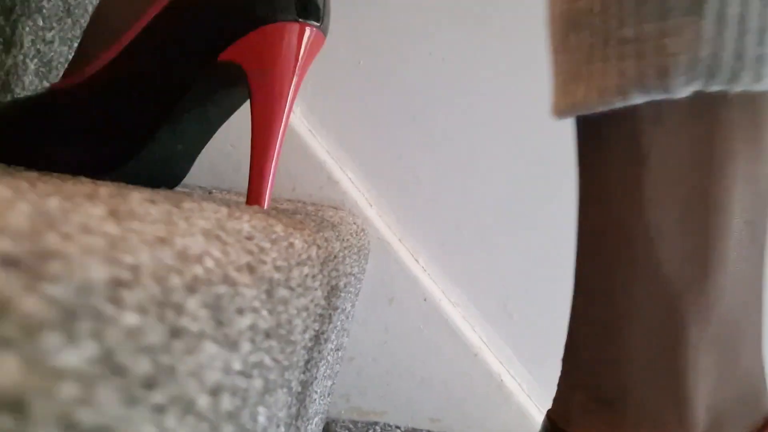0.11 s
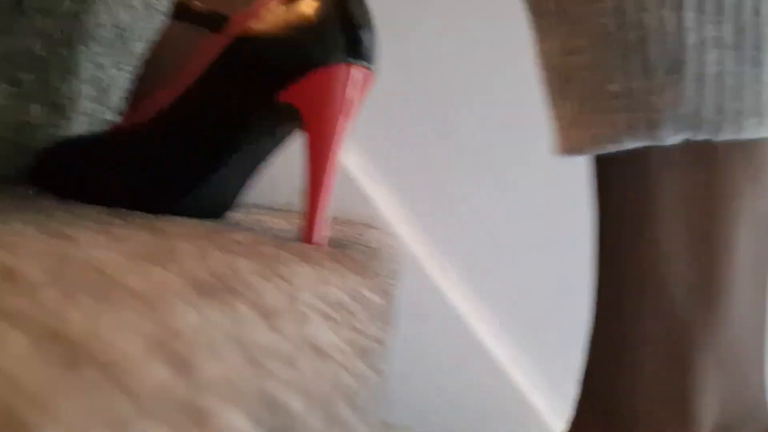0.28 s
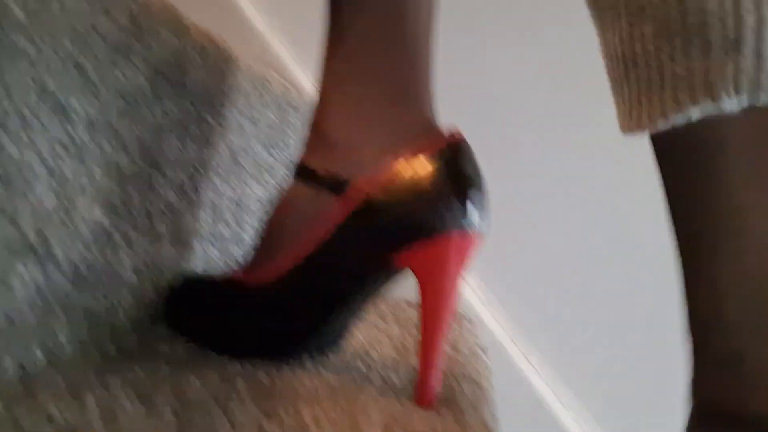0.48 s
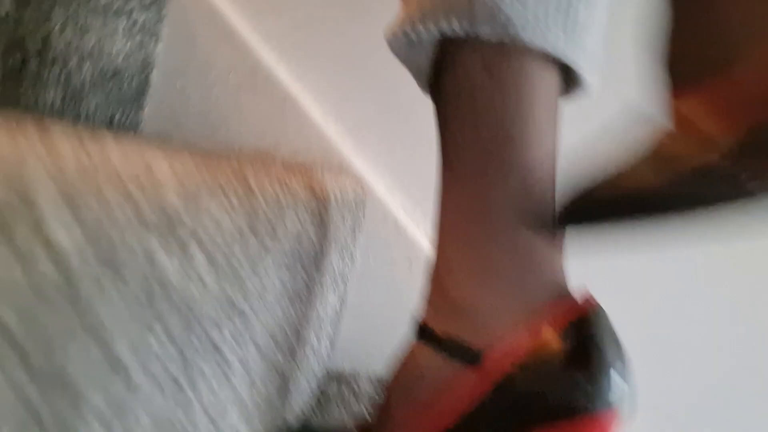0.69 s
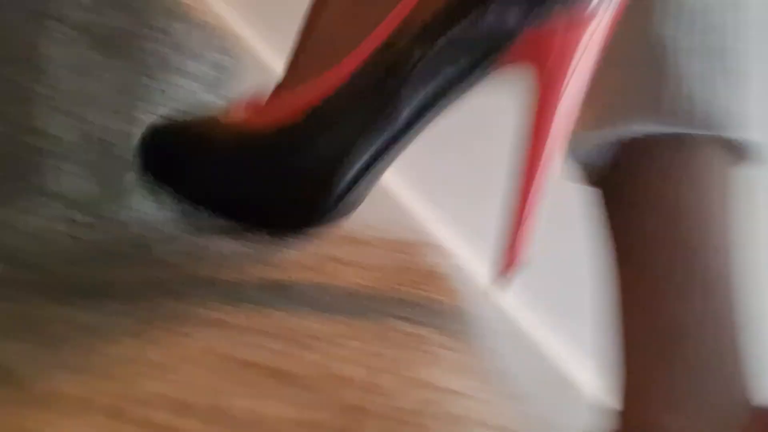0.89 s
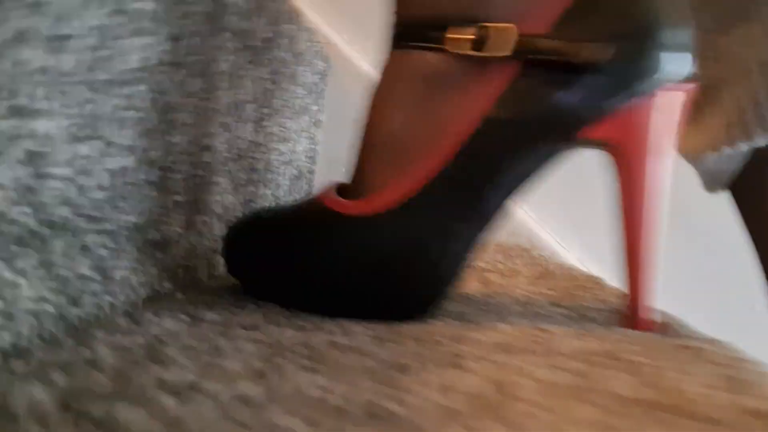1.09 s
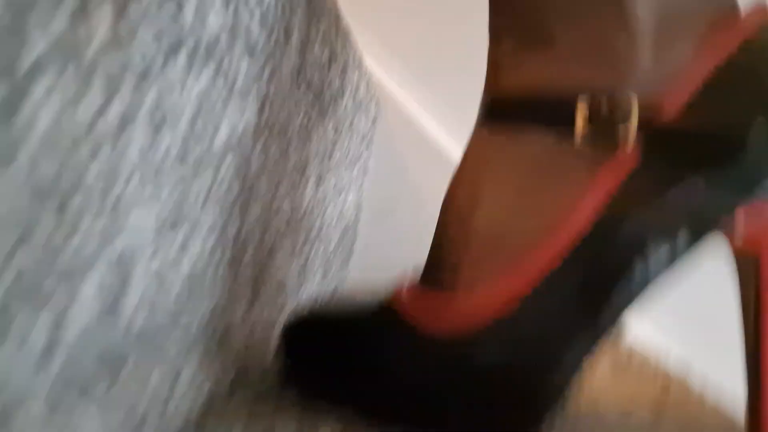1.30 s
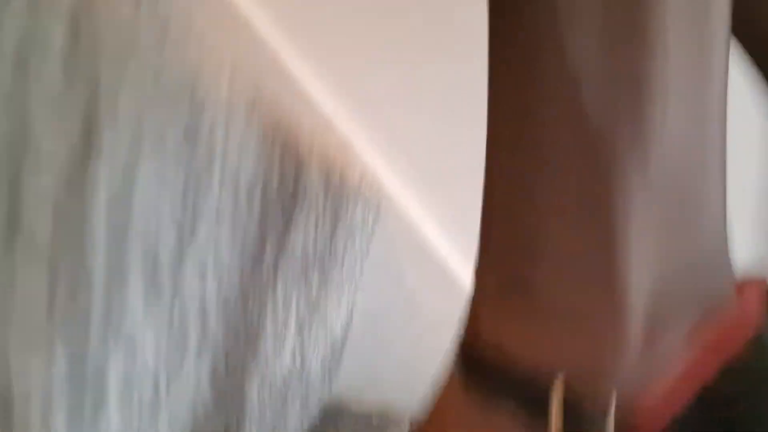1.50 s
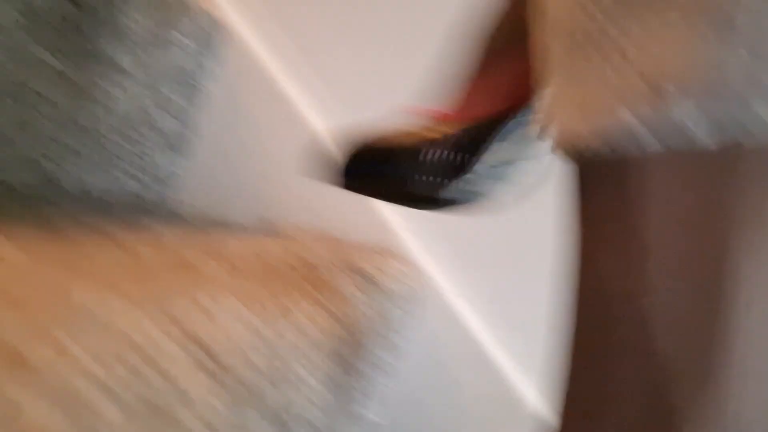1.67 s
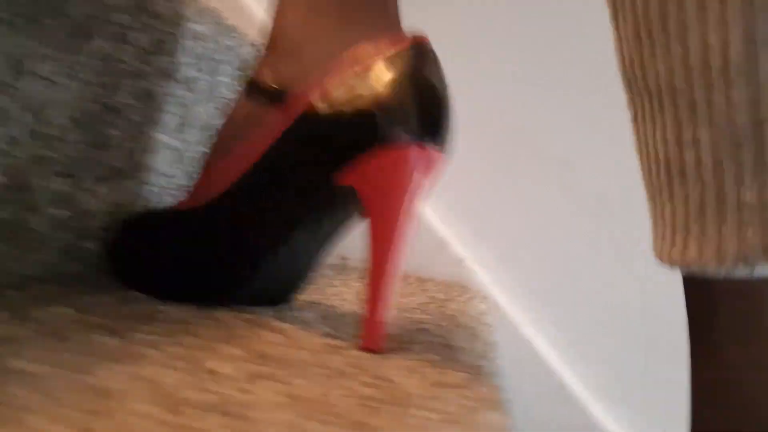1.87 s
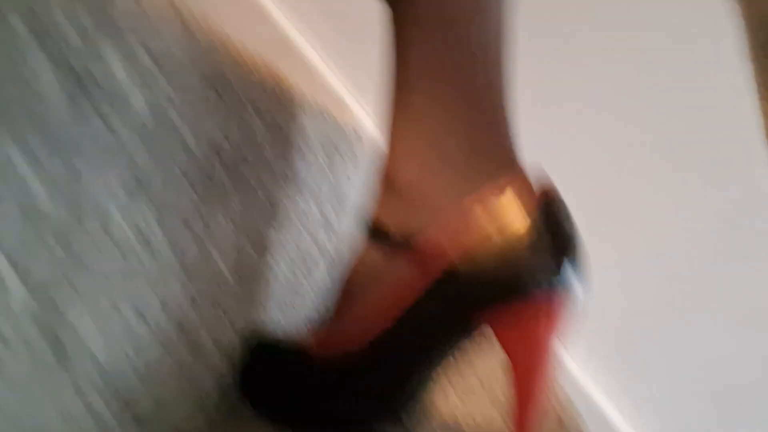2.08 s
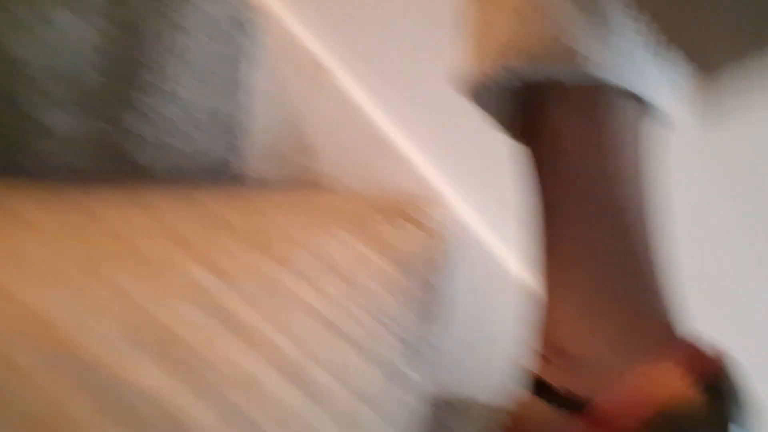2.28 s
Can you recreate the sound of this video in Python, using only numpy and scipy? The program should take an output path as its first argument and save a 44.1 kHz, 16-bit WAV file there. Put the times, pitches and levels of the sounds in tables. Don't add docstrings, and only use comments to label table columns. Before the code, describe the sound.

High-heeled footsteps on carpeted wooden stairs, close and stereo. Muffled low thuds land at 0.2 and 0.35 s with cloth brushing. Around 1.0-1.1 s a deep thump and carpet scuff lead to dull touches at 1.22 and the loudest, sharp woody heel knock at 1.28. Quiet rustles and faint low creaking sway follow; a soft thud at 1.98, firmer padded tap at 2.09, small ticks to 2.2. Short indoor tail, faint hiss.

```python
import sys
import numpy as np
from scipy import signal
from scipy.fft import rfft, irfft, next_fast_len
from scipy.io import wavfile
from scipy.ndimage import uniform_filter1d

SR = 44100
rng = np.random.default_rng(int(sys.argv[2]) if len(sys.argv) > 2 else 0)


def wav_out(sig):
    wavfile.write(sys.argv[1], SR, np.round(np.clip(np.atleast_2d(sig).T, -1, 1) * 32767).astype(np.int16))


def amp(db):
    return 10 ** (np.asarray(db, float) / 20)


N = 105840
LEFT_RIGHT = np.array([[1], [-1]])


def in_time(rows):
    s, *columns = np.transpose(rows)
    return [np.interp(np.arange(N) / SR, s, column) for column in columns]


def rms_one(x):
    return x / np.sqrt(np.mean(x ** 2) + 1e-20)


def at_hz(points, hz):
    point_hz, point_db = np.transpose(points)
    return np.interp(np.log(hz), np.log(point_hz), point_db)


def low_cut(hz, corner_hz):
    return -12 * np.maximum(np.log2(corner_hz / hz), 0)


def colour(x, db_at):
    hz = np.maximum(np.fft.rfftfreq(N, 1 / SR), 20)
    return irfft(rfft(x) * amp(db_at(hz)), N)


def body(force, modes, flip):
    out = 0
    for k, (hz, db, t60) in enumerate(modes):
        r, w = amp(-60 / (t60 * SR)), 2 * np.pi * hz / SR
        sign = -1 if flip and k % 2 else 1
        ring = signal.lfilter([0, np.sin(w)], [1, -2 * r * np.cos(w), r * r], force + 1e-18)
        out = out + sign * amp(db) * ring
    return out


def push(s, db, width_s):
    out, start = np.zeros(N), int(s * SR)
    t = np.maximum(np.arange(start, start + 2000) / SR - s, 0) / (width_s / 4)
    out[start:start + len(t)] = t * np.exp(-t)
    return amp(db) * out / out.sum()


def sides(x, pan_db, lag_s):
    n = np.arange(N)
    later = np.interp(n - lag_s * SR * np.tanh(pan_db / 3), n, x)
    return np.array([x * amp(pan_db / 2), later * amp(-pan_db / 2)])


def swell(s, length, db, pan_db):
    rise_share = 0.19
    u = (np.arange(N) / SR - s) / length
    shape = np.clip(np.minimum(u / rise_share, (1.3 - u) / (1.3 - rise_share)), 0, 1) ** 1.33
    return shape * amp(db + pan_db / 2 * LEFT_RIGHT)


def fibres():
    grains_per_s, spread_db, hiss_share = 2500, 7.5, 0.7
    struck = rng.random(N) < grains_per_s / SR
    strength = amp(spread_db * np.minimum(rng.exponential(1, N), 4))
    ticks = struck * strength * rng.choice([-1, 1], N)
    return hiss_share * rng.standard_normal((2, N)) + (1 - hiss_share) * rms_one(ticks)


def pile(rows, rise_db, fall_db):
    noise, out = fibres(), 0
    for s, length, db, top_hz, pan in rows:
        def peak(hz):
            octaves = np.log2(hz / top_hz)
            return np.minimum(rise_db * octaves, -fall_db * octaves)
        out = out + rms_one(colour(noise, peak)) * swell(s, length, db, pan)
    return out


def loaded(modes):
    x = rms_one(body(rng.standard_normal(2 * N), modes, False)[N:])
    return rms_one(x / np.sqrt(uniform_filter1d(x * x, size=3000) + 0.32))


# frequency in Hz, gain in dB.
MIC_PORT = [(7600, 1.14), (8500, -6), (9200, 4.5), (11500, -0.7), (15700, 5)]
# frequency in Hz, level in dB per Hz.
AIR_SPECTRUM = [(88, -26), (150, -3.5), (172, -16), (239, -9.5), (492, -24.5), (850, -21), (8470, -39.5),
                (9520, -37), (15800, -49.5)]
# frequency in Hz, likeness from 0 to 1.
LIKENESS = [(150, 0.91), (500, 0.086), (2000, 0.028), (15000, 0.014)]


def air():
    def share(sign):
        def db_at(hz):
            alike = np.clip(at_hz(LIKENESS, hz), 0, .99)
            spectrum = at_hz(AIR_SPECTRUM, hz) + at_hz(MIC_PORT, hz) + low_cut(hz, 150)
            return spectrum + 10 * np.log10(1 + sign * alike)
        return db_at

    mid, side = rng.standard_normal((2, N))
    return amp(-70.5) * rms_one(colour(mid, share(0.93)) + colour(side, share(-1.06)) * LEFT_RIGHT)


# frequency in Hz, level in dB per Hz.
CLOTH_SPECTRUM = [(880, -43), (1500, -0.5), (2410, -1.5), (3790, -10), (4890, 2), (5780, -2), (7470, 0),
                  (14700, -8), (15800, -25)]
# start in seconds, length in seconds, level in dB, left-right in dB.
CLOTH_BRUSHES = [(.008, 0.034, -67.5, -7), (-.02, 0.34, -67, -3), (0.195, 0.068, -71, -4),
                 (.352, 0.03, -67.5, -5), (0.384, 0.031, -65, -6), (0.412, 0.1, -72, -7),
                 (0.585, 0.037, -71.5, -4), (0.634, 0.03, -68.5, 0), (0.721, 0.012, -76, -13),
                 (0.812, 0.23, -76.5, -6), (1.085, 0.039, -66, 3.), (1.339, 0.091, -75, -9.5),
                 (1.478, 0.029, -76, -8), (1.547, 0.048, -73, -4), (1.642, 0.049, -73.5, -2),
                 (1.81, 0.18, -77.5, -1), (1.972, 0.054, -66, 1), (2.063, 0.018, -73.5, -2),
                 (2.148, 0.0062, -68, -6), (2.211, 0.0038, -66, 0)]


def cloth():
    def db_at(hz):
        return at_hz(CLOTH_SPECTRUM, hz) + at_hz(MIC_PORT, hz) + low_cut(hz, 1500)
    return rms_one(colour(fibres(), db_at)) * sum(swell(*brush) for brush in CLOTH_BRUSHES)


# start in seconds, length in seconds, level in dB,
# centre frequency in Hz, left-right in dB.
DRAGS = [(0.01, 0.17, -73.5, 680, -1.5), (.1, 0.12, -73.5, 2560, 2), (.6, 0.19, -73, 280, 8),
         (1.03, 0.074, -58, 189, -3), (1.33, .13, -64.5, 820, -1), (1.44, 0.26, -69, 360, 5),
         (1.9, 0.06, -71, 290, 4), (2.005, 0.051, -54, 270, 7), (.51, 0.13, -79.5, 6600, -4),
         (1.084, 0.016, -63.5, 1850, 5), (1.275, 0.049, -58, 557, 11)]


def drags():
    return pile(DRAGS, rise_db=29.5, fall_db=29.5)


# time in seconds, flight, joist and tread levels in dB, contact in ms.
LANDINGS = [(0.1998, -49, -33.5, -37, 6.1), (0.2119, -49, -27.5, -41, 4.15), (0.353, -47.5, -39, -48, 7.8),
            (1.003, -36.5, -44, -41, 6.8), (1.084, -60, -50, -41, 3.1), (1.106, -72, -43.5, -39.5, 4.1),
            (1.124, -31, -51, -42, 1.3), (1.222, -57, -52, -45, 0.62), (1.2792, -49, -58, -28, 1.9),
            (1.297, -57, -49.5, -37, 1.45), (1.982, -54, -50, -38.5, 2.1), (1.992, -38.5, -45.5, -36, 2.5),
            (2.092, -51, -63, -39, 2.2), (2.107, -48, -58, -36, 4.1)]


def footfalls(part):
    return -sum(push(s, levels[part], ms / 1000) for s, *levels, ms in LANDINGS)


# time in seconds, joist level in dB, tread level in dB.
SHIFTING_WEIGHT = [(0, -57.5, -74), (.3, -69, -54.5), (.5, -58, -65.5), (.62, -66, -62.5),
                   (.68, -53.5, -63.5), (.76, -58, -56), (.92, -52.5, -61), (.96, -67.5, -60),
                   (1.15, -45, -54), (1.45, -67, -51), (1.5, -57, -61.5), (1.62, -57, -57.5),
                   (1.7, -48, -61.5), (1.9, -54, -63.5), (1.96, -58, -61), (2.02, -49, -43),
                   (2.17, -58, -52), (2.4, -59, -76)]
# frequency in Hz, level in dB, t60 in seconds.
FLIGHT_MODES = [(29.4, -12, 0.16), (43.7, -4, 0.25)]
JOIST_MODES = [(58.54, -0.1, 0.42), (77.2, -4.5, 0.16), (92.9, -4.5, 0.29)]
RISER_MODES = [(136.4, 2.2, 0.28)]
TREAD_MODES = [(117.85, -6.5, 0.35)]
LOADED_JOISTS = [(56.67, .1, 0.52)]
LOADED_TREAD = [(117.7, .1, 0.94)]


def stairs():
    joist_db, tread_db = in_time(SHIFTING_WEIGHT)
    joist_force = footfalls(1)
    low = body(footfalls(0), FLIGHT_MODES, False) + body(footfalls(2), TREAD_MODES, False)
    low = low + body(joist_force, JOIST_MODES, False) + body(joist_force, RISER_MODES, False)
    low = low + amp(joist_db) * (loaded(LOADED_JOISTS) + amp(-4.5) * loaded(FLIGHT_MODES))
    low = low + amp(tread_db) * loaded(LOADED_TREAD)
    _, late = sides(low, 1.7, 0.0067)
    return low - late * amp(-17) * LEFT_RIGHT


# start in seconds, length in
# seconds, level in dB, # strongest frequency in Hz, left-right in dB.
PILE_CRUSHES = [(0.188, 0.058, -60.5, 900, 3), (0.218, 0.12, -64.5, 200, 3), (0.339, 0.15, -60.5, 300, 3),
                (0.602, 0.11, -66.5, 1100, 0), (0.985, 0.052, -63.5, 158, 5),
                (1.079, 0.031, -60.5, 850, -0.5), (1.093, 0.056, -55, 333, 9.5),
                (1.21, 0.079, -54, 340, -3), (1.27, 0.076, -49.5, 400, 8.5), (1.533, 0.091, -67, 1320, -3),
                (1.644, 0.042, -65, 1260, -1.5), (1.97, 0.062, -57.5, 670, 9), (2.049, 0.16, -61, 400, 3),
                (0.866, 0.17, -71, 2350, -1)]


def carpet():
    return pile(PILE_CRUSHES, rise_db=7.5, fall_db=8.5)


# time in seconds, level in dB, pitch in Hz, left-right in dB.
LEATHER_SNAPS = [(.189, -55, 780, 8), (.201, -54, 1080, -1), (0.204, -55.5, 1900, -3),
                 (.389, -53, 1510, 2.5), (.398, -60, 890, 8), (0.639, -68, 1200, -4),
                 (1.083, -56, 830, 2.5), (1.086, -55, 1880, 8), (1.092, -48.5, 700, 1),
                 (1.093, -60, 1850, 5), (1.1055, -64, 1700, 5), (1.123, -54, 3200, 7),
                 (1.127, -55, 1070, 2), (1.235, -48, 4600, 1), (1.2445, -54, 3500, 5), (1.27, -49, 3300, 7),
                 (1.277, -40, 3200, 7), (1.296, -43, 1610, 6), (1.535, -68, 880, -2.5),
                 (1.561, -63, 1620, -0.5), (1.65, -57, 1350, 3), (1.982, -53, 2980, 9),
                 (1.999, -50, 1700, 10), (2.086, -54, 1180, 0), (2.112, -53, 1160, -3),
                 (2.134, -57, 1300, 3), (2.165, -56.5, 740, -3), (2.18, -65.5, 1490, 7),
                 (2.212, -57, 3320, 2)]


def snaps():
    out = 0
    for s, db, hz, pan in LEATHER_SNAPS:
        ring = body(push(s, db, 0.00013), [(hz, 0, 20 / hz)], False)
        out = out + sides(ring, pan, 0.00008)
    return out


BOARD_LAG_S = 0.00033
# frequency in Hz, level in dB, t60 in seconds.
BOARD_MODES = [(163, -9, 0.19), (230.6, -6.5, 0.11), (296.7, -4.5, 0.12), (372.5, -5, 0.084),
               (454, -5.5, 0.048), (686, -23, .05)]


def board():
    return sides(body(footfalls(2), BOARD_MODES, True), 4, BOARD_LAG_S)


# time in seconds, level in dB, left-right in dB, dullness cut-off in Hz.
HEEL_KNOCKS = [
    (1.2213, -45, 3, 2800),
    (1.235, -46, 4, 2820),
    (1.2741, -47.5, -5, 5000),
    (1.2787, -24.5, 7.5, 14200),
    (1.2791, -21.5, 4.5, 3860),
    (1.2885, -42, 0, 12000),
    (1.299, -42, -8, 4950),
]
# frequency in Hz, level in dB, t60 in seconds.
HEEL_MODES = [(1047, -6.5, 0.043), (1400, 1, 0.019), (1565, -1.3, 0.018), (2258, -11.5, 0.013),
              (2710, -29.5, 0.028), (3123, -10, 0.026), (3504, -13.5, 0.032), (5210, -12, 0.0065),
              (7570, -10, 0.003), (9460, -7.5, 0.0042), (13000, -11, 0.002)]
SEAT_MODES = [(472, -5.5, 0.023), (653, -6.5, 0.022), (840, -9, 0.065)]


def heel():
    out = 0
    for s, db, pan, cut_hz in HEEL_KNOCKS:
        force = -push(s, db, 0.66 / cut_hz)
        out = out + sides(body(force, HEEL_MODES, True), pan, 0.000685)
        out = out + sides(body(force, SEAT_MODES, True), pan, BOARD_LAG_S)
    return out


# time in seconds, level in dB, left-right in dB.
SOLE_TAPS = [
    (1.65, -67, 0),
    (1.982, -57.5, 5),
    (2.052, -58.5, -2),
    (2.091, -34, 5.5),
    (2.111, -56, 3),
    (2.146, -51, 6.5),
    (2.211, -62.5, 8),
]
# frequency in Hz, level in dB, t60 in seconds.
SOLE_MODES = [(300, -0.5, 0.044), (700, -8, 0.031), (1024, 3, 0.021), (1320, -3.5, .015),
              (1480, -0.5, 0.024), (1733, 1, 0.035), (2330, -16.5, 0.015)]


def sole():
    return sum(sides(body(-push(s, db, 0.00019), SOLE_MODES, True), pan, BOARD_LAG_S)
               for s, db, pan in SOLE_TAPS)


# octave centre in Hz, level in dB, t60 in seconds.
STAIRWELL_BANDS = [(200, -3, 0.59), (400, -5.5, 0.31), (768, -11.5, 0.31), (1650, -39, 0.11),
                   (3200, -12.5, 0.1), (6340, -25, 0.15)]


def stairwell(x):
    t, tail, size = np.arange(N) / SR, 0, next_fast_len(2 * N)
    for hz, db, t60 in STAIRWELL_BANDS:
        edges = [hz / np.sqrt(2), hz * np.sqrt(2)]
        octave = signal.butter(2, edges, "band", fs=SR, output="sos")
        band = signal.sosfilt(octave, rng.standard_normal((2, N)))
        onset = np.minimum(t / 0.012, 1)
        tail = tail + amp(db - 60 * t / t60) * onset * band / np.sqrt(t60 * SR / 14)
    mid, side = irfft(rfft(x, size) * rfft(tail, size), size)[:, :N]
    return mid + amp(-11) * side * LEFT_RIGHT


def scene():
    near = carpet() + snaps() + board() + heel() + sole()
    return air() + cloth() + drags() + stairs() + near + stairwell(near.mean(axis=0))


def roll_off(x):
    return signal.sosfilt(signal.butter(12, 16430, fs=SR, output="sos"), x)


def record(dry):
    mix = signal.sosfilt(signal.butter(2, 22, "high", fs=SR, output="sos"), dry)
    return roll_off(mix)


dry = scene()
out = record(dry)
wav_out(out)
```